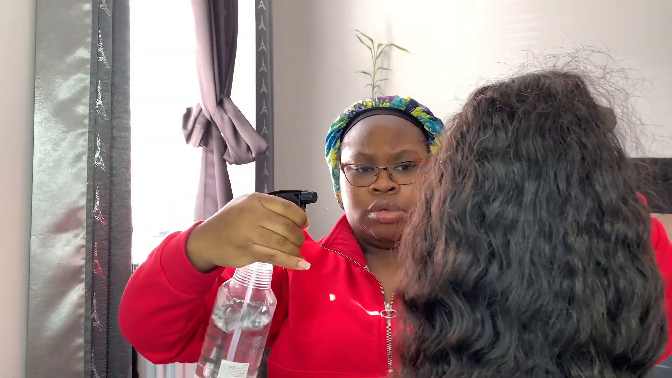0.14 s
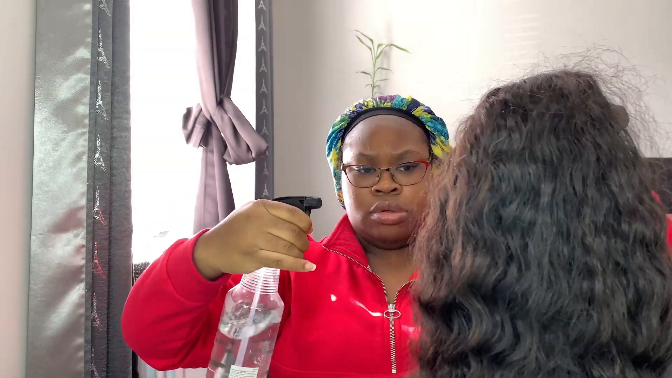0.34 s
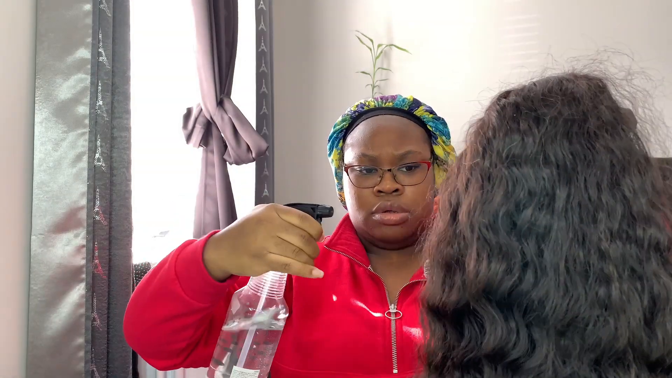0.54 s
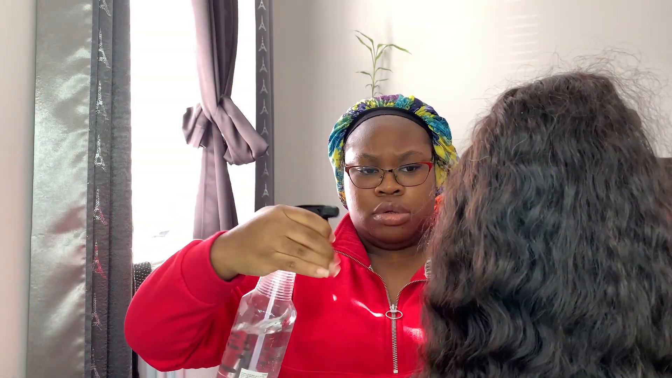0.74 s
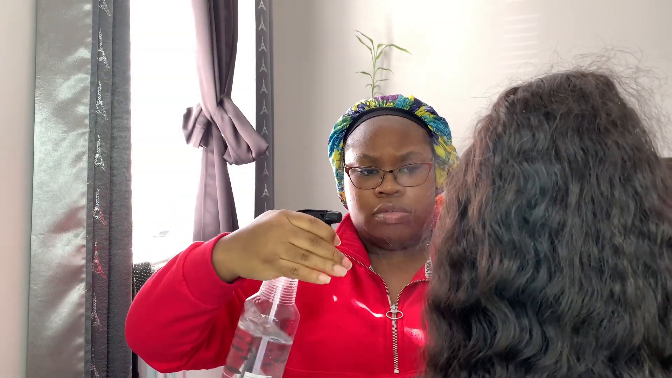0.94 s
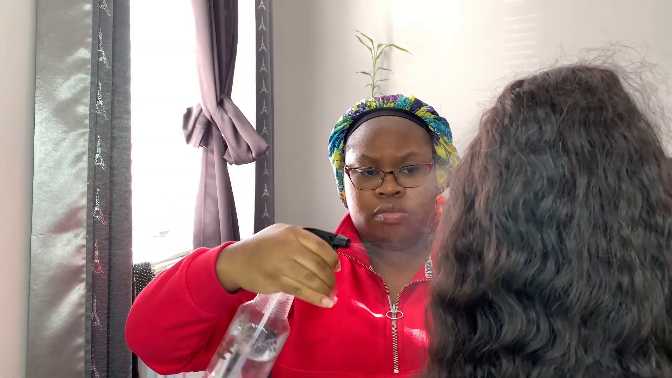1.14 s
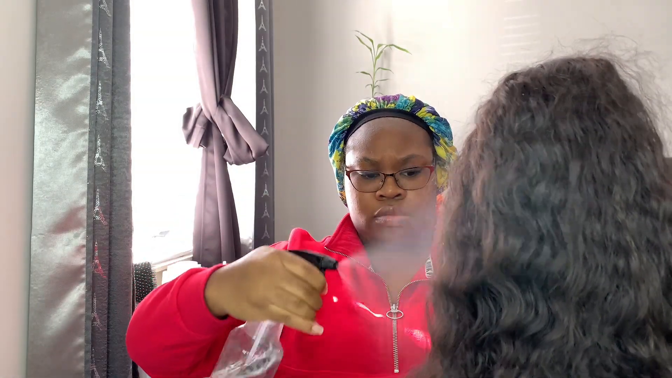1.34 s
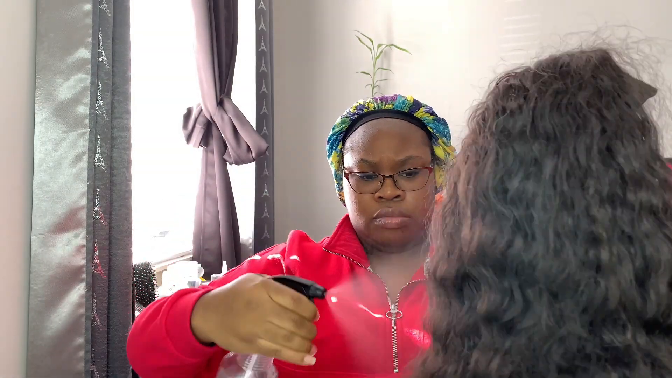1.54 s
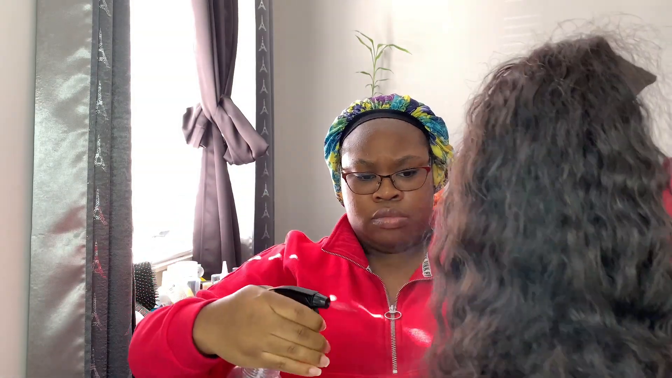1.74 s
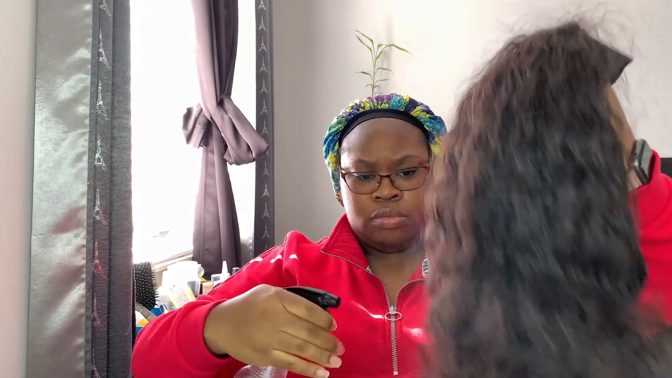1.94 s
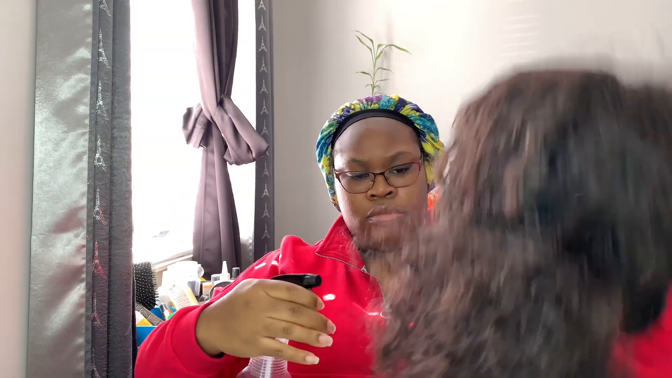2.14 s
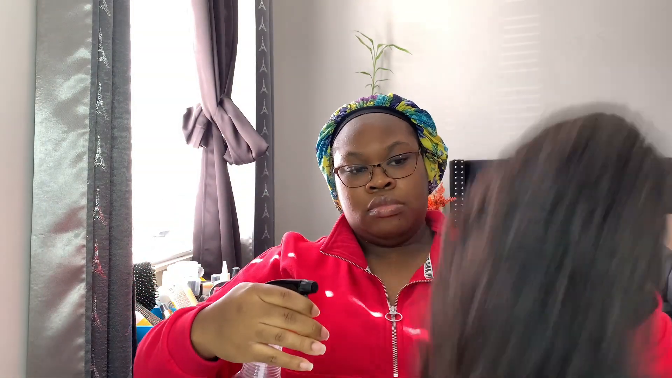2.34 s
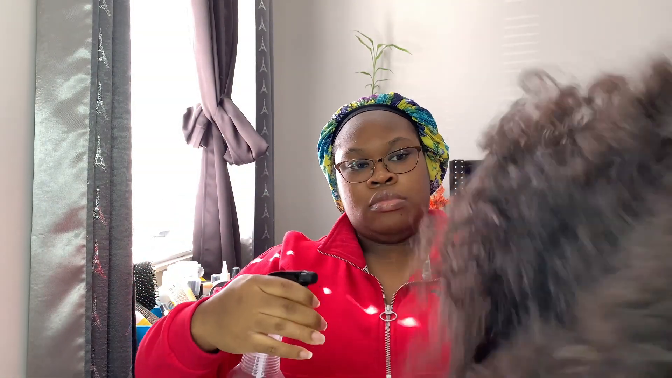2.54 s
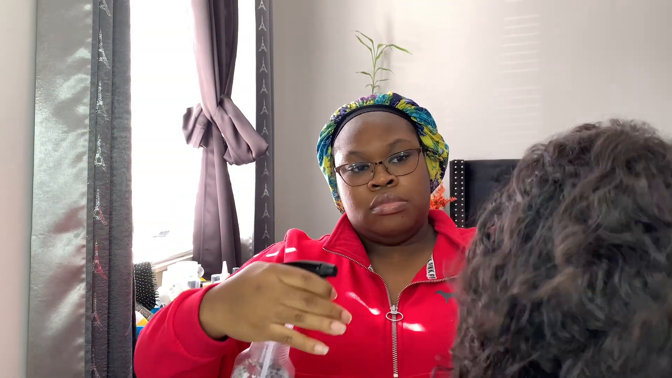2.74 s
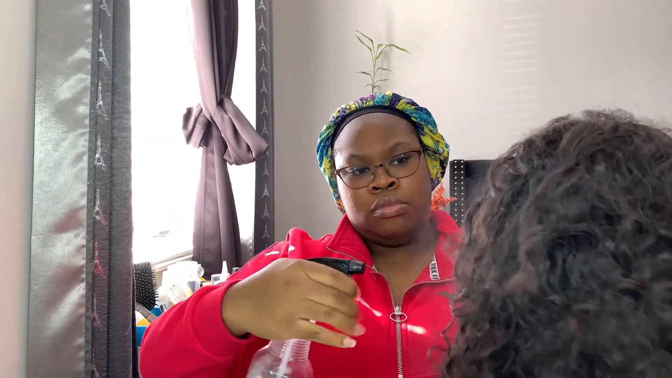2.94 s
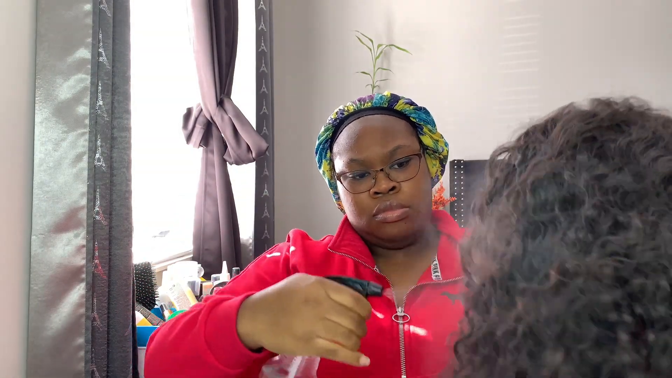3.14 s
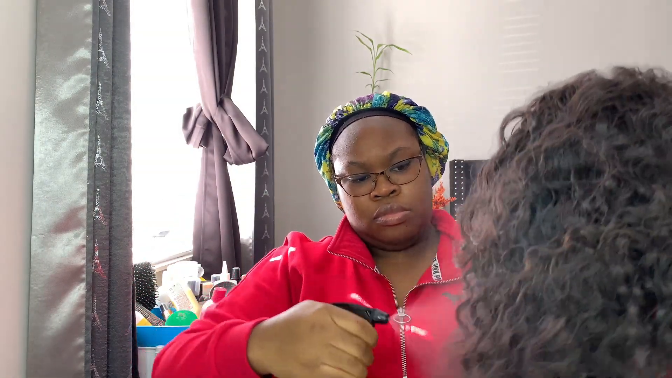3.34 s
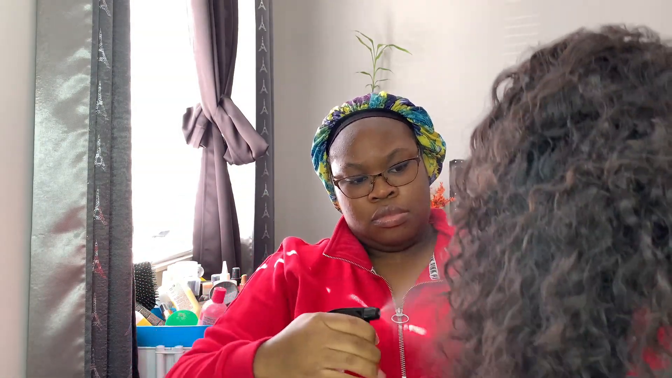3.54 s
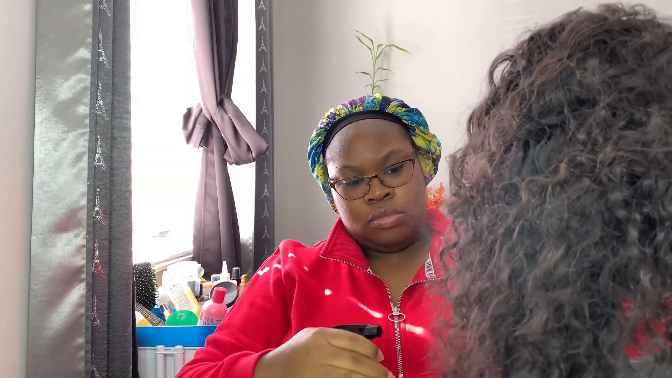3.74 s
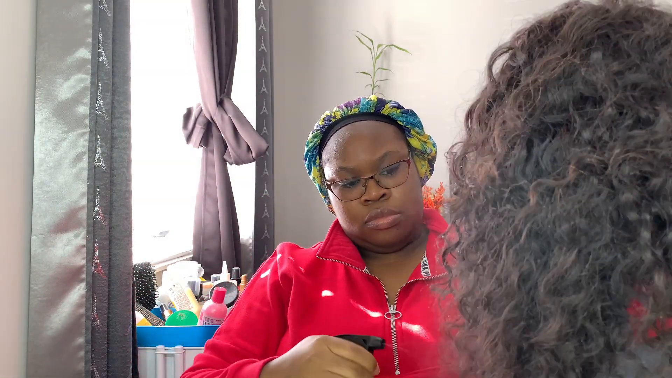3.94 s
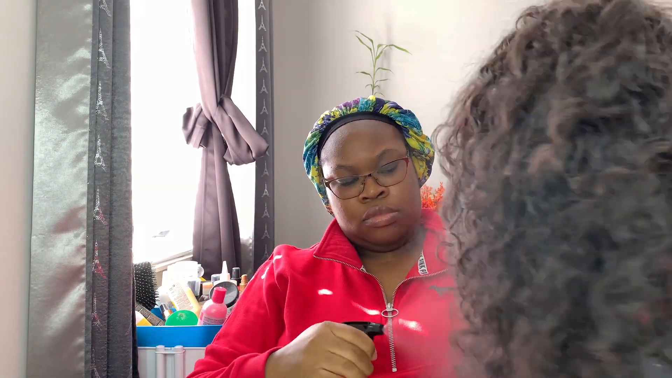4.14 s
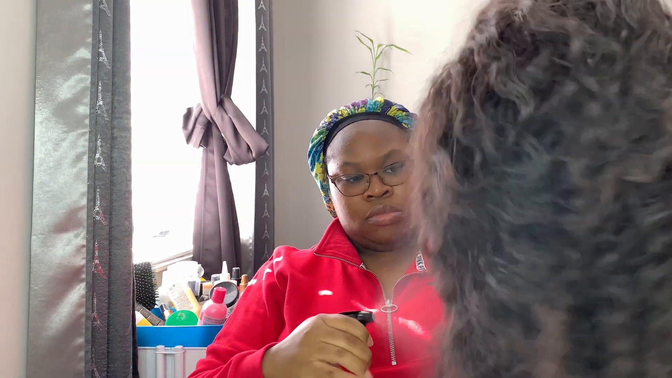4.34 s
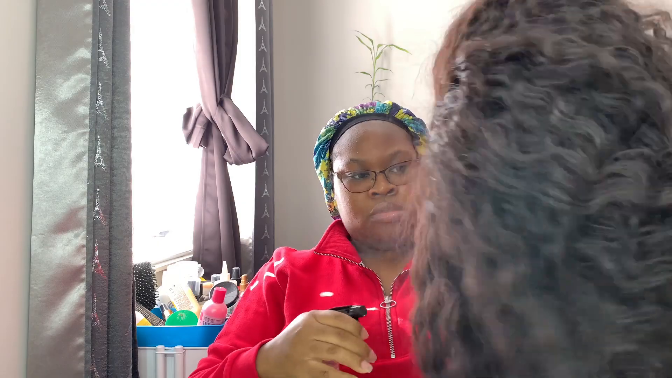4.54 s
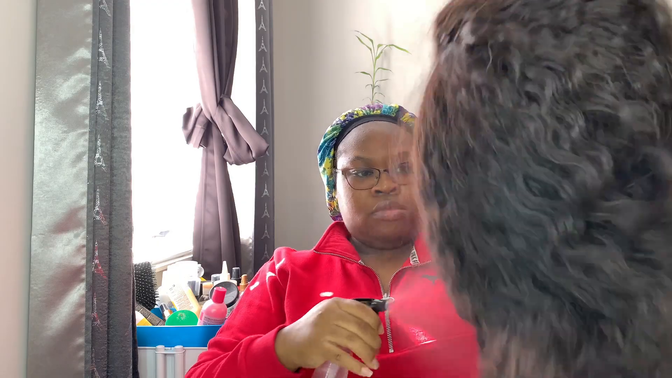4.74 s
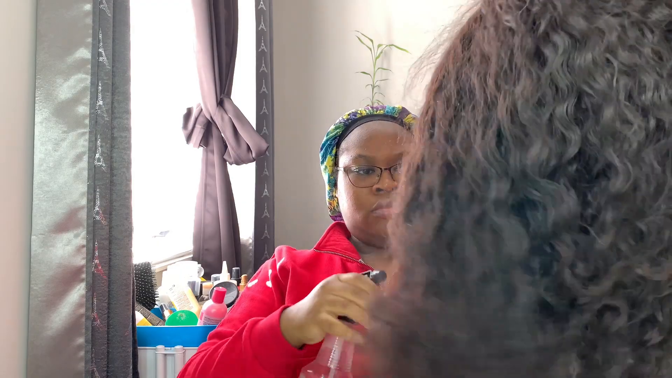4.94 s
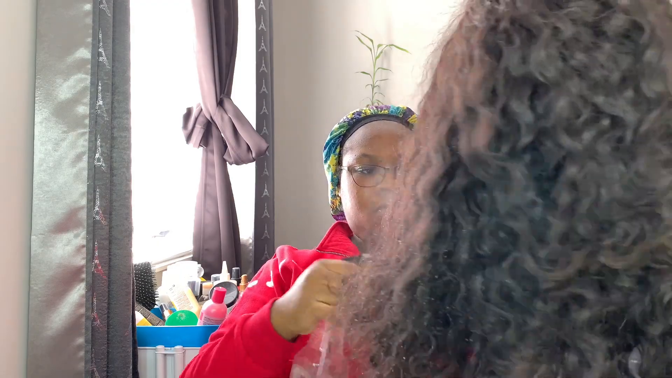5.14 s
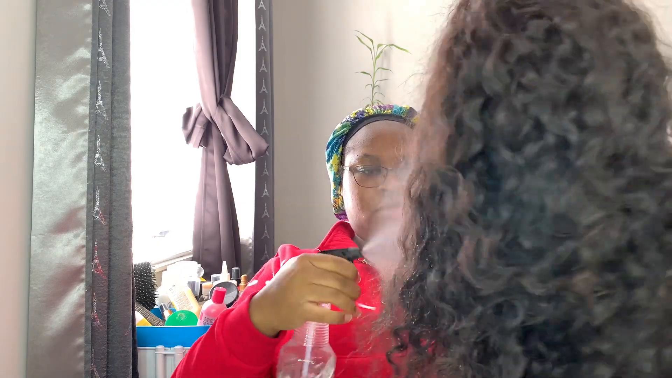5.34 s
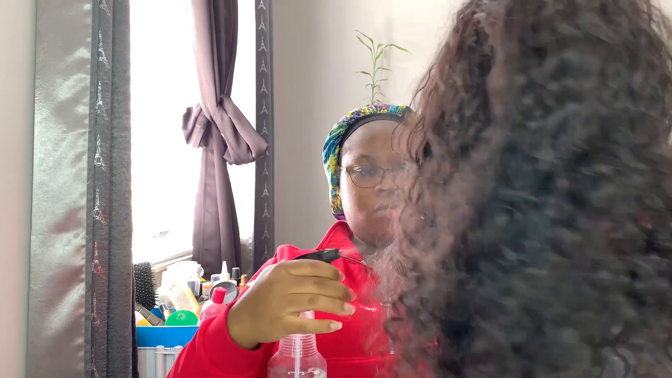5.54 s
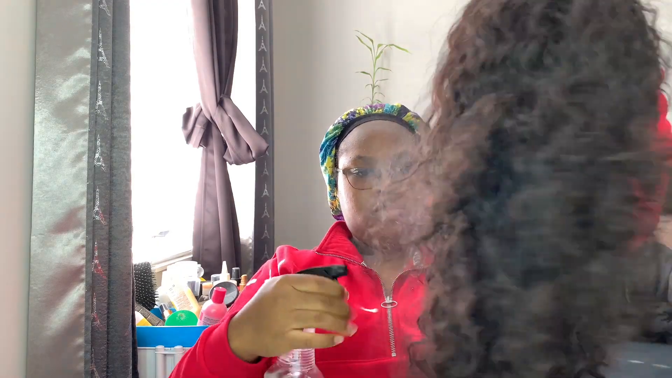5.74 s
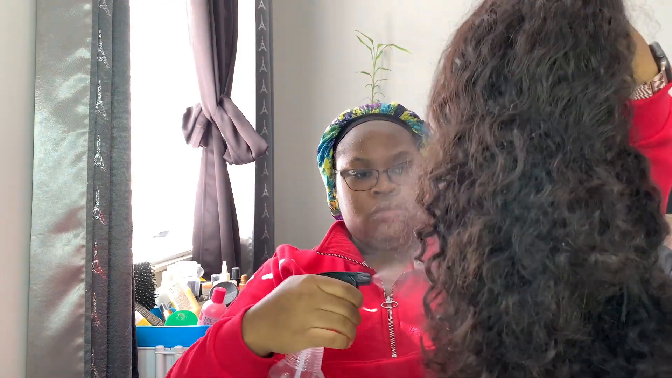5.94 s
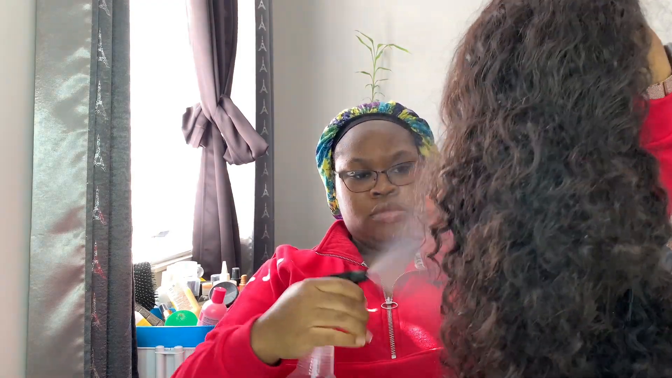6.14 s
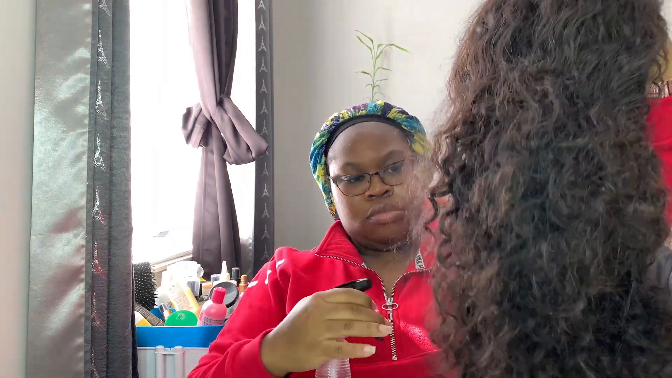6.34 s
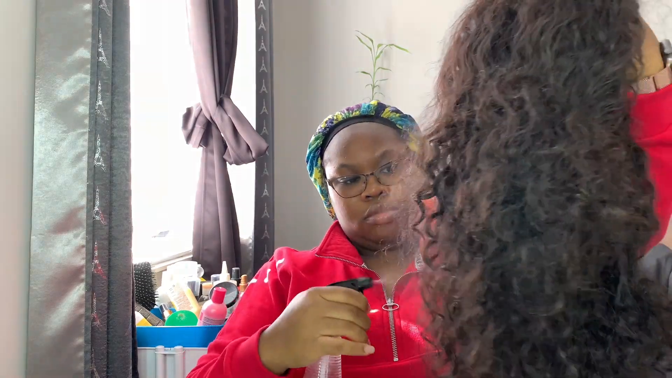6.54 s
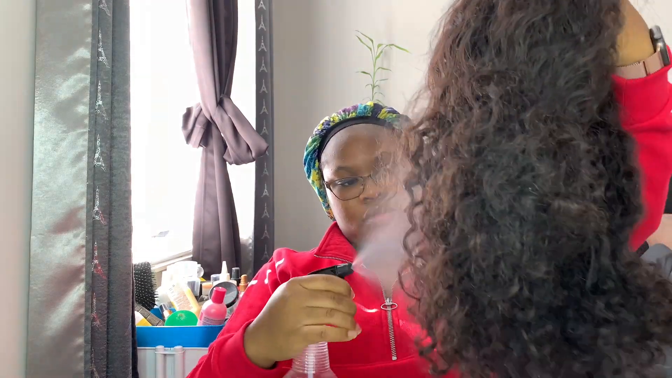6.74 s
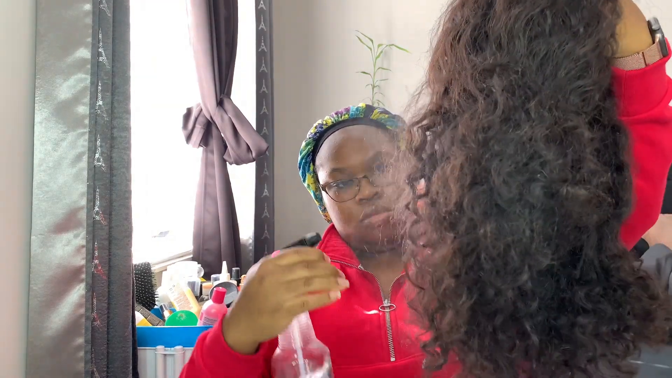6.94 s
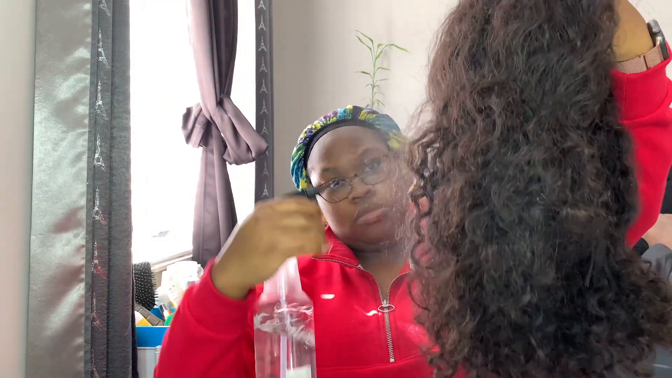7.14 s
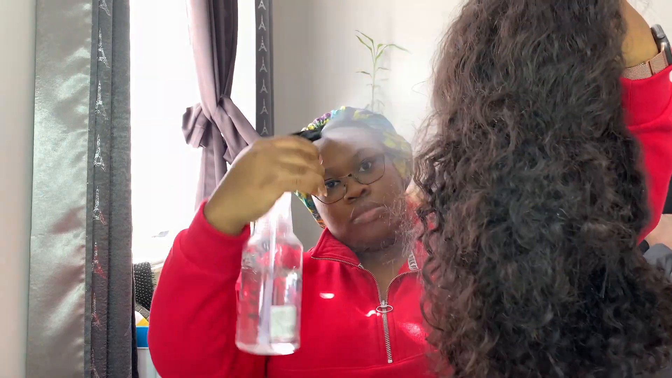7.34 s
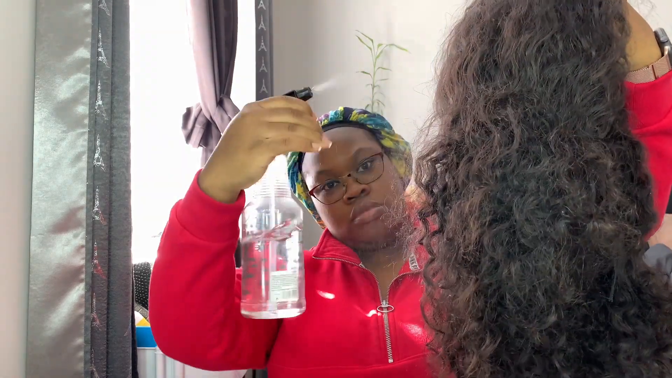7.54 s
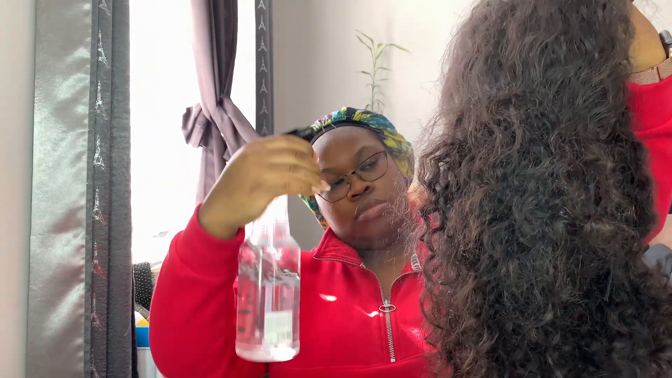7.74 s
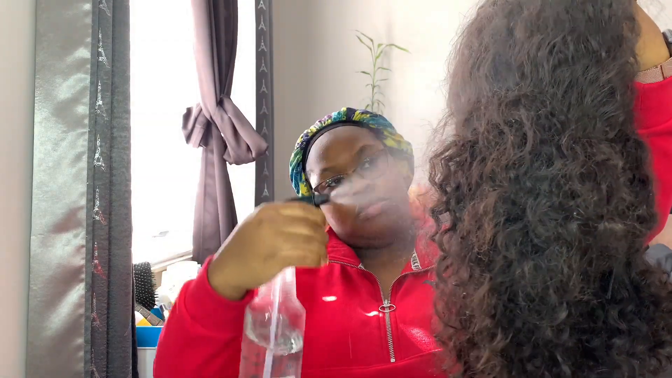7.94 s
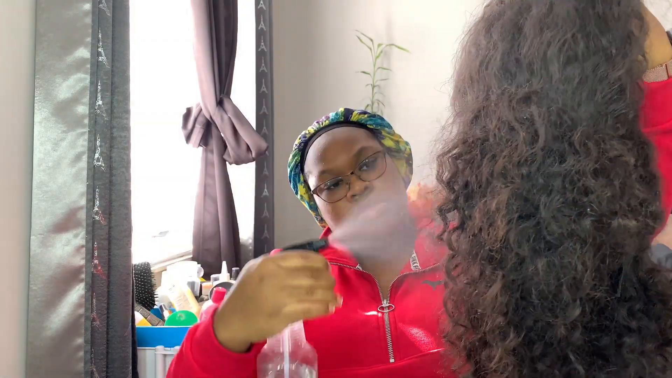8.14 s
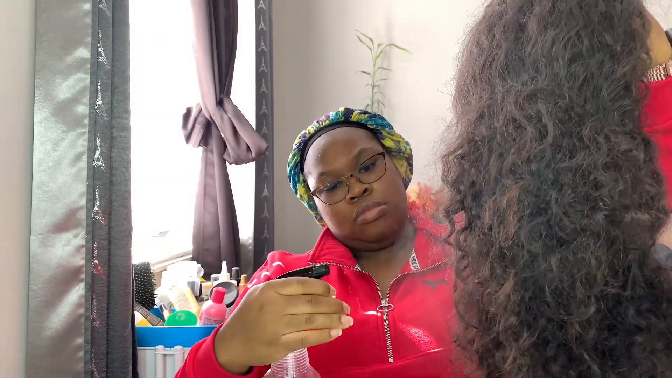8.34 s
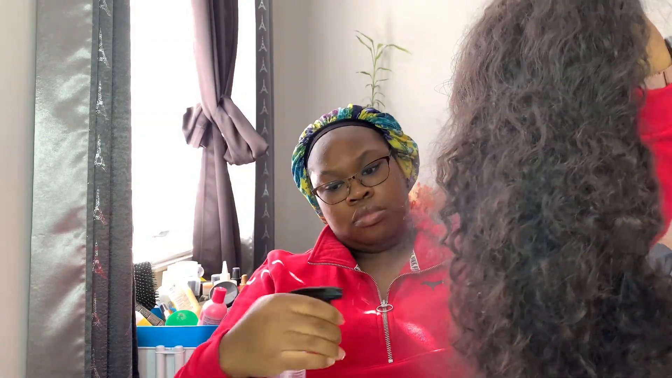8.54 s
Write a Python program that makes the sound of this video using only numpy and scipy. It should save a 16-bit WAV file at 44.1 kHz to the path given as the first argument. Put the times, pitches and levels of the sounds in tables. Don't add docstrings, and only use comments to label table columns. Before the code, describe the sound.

Close to a phone microphone in a furnished room, a hand works a plastic trigger sprayer. Dry rattles and sputtering, clicky strokes come first, then a pause of about a second with soft hair rustle. Steady pulls follow, nearly four per second, each a hollow bottle knock, click and short bright hiss of mist, with a rattling slurp on release. A faint low motor and house rumble lie underneath.

```python
import sys
import numpy as np
from scipy import signal
from scipy.fft import rfft, irfft, next_fast_len
from scipy.io import wavfile
from scipy.ndimage import uniform_filter1d, minimum_filter1d, map_coordinates

SR = 44100
rng = np.random.default_rng(int(sys.argv[2]) if len(sys.argv) > 2 else 0)


def unload_audio(sound):
    columns = np.transpose(np.atleast_2d(sound))
    steps = np.round(np.clip(columns, -1, 1) * 32767)
    wavfile.write(sys.argv[1], SR, steps.astype(np.int16))


def invert_db(x):
    u = np.asarray(x, float) / 20
    return 10 ** u


N = 379260
SIZE = next_fast_len(N + SR // 2)
HZ = np.maximum(np.arange(SIZE // 2 + 1) * SR / SIZE, 1)

# valve click t/s, stroke/s, nozzle level/dB, knock level/dB, bottle f/Hz
PRIMING = [
    (0.733, 0.12, -54, -65, 273),
    (0.9757, 0.14, -52, -45.5, 261),
    (1.231, 0.15, -50.5, -48.5, 270),
    (1.494, 0.13, -46, -44.5, 271),
    (1.734, 0.12, -46, -42, 280),
]
# valve click t/s, stroke/s, nozzle level/dB, knock level/dB, bottle f/Hz
PULLS = [(2.783, 0.13, -46.5, -85, 272), (3.024, 0.12, -43, -42, 269.5), (3.263, 0.13, -41, -41, 268.4),
         (3.5234, 0.13, -44, -39.5, 272), (3.7873, 0.13, -44.5, -46, 273), (4.046, 0.13, -45, -42.5, 284),
         (4.3069, .12, -46, -44, 276), (4.7102, 0.13, -44, -70, 263), (4.993, 0.15, -43, -50, 280),
         (5.2748, 0.14, -43.5, -50.5, 274), (5.5472, 0.14, -43.5, -53.5, 276),
         (5.827, 0.14, -44, -43.5, 275), (6.1046, 0.14, -43, -44.5, 273), (6.388, 0.15, -45, -48.5, 275),
         (6.6798, 0.15, -44, -50.5, 280), (6.9703, 0.15, -46, -42.5, 279), (7.265, 0.14, -46.5, -51.5, 283),
         (7.5415, 0.16, -49, -44.5, 260), (7.8312, 0.14, -49, -43, 270), (8.1075, 0.13, -45.5, -42.5, 255),
         (8.3774, 0.12, -43, -45, 275)]
# valve click t/s, slurp fall/s, slurp level/dB, click level/dB
RELEASES = [(0.407, 0.045, -57, -50), (0.646, 0.037, -52.5, -42), (0.8897, 0.034, -52.5, -37),
            (1.1644, 0.026, -52.5, -40), (1.4354, 0.015, -50, -34), (1.675, 0.028, -58, -42),
            (1.929, 0.043, -55, -42), (2.979, 0.04, -53.5, -45), (3.2093, 0.02, -49, -33),
            (3.457, 0.037, -51, -35), (3.706, 0.032, -48.5, -28.5), (3.9646, 0.011, -49, -42),
            (4.243, 0.032, -51, -43), (4.923, 0.029, -55.5, -67), (5.2027, 0.025, -52, -32.5),
            (5.4818, 0.021, -52, -33), (5.757, 0.032, -52.5, -31.5), (6.027, 0.026, -49, -33),
            (6.311, 0.032, -51.5, -43), (6.605, 0.037, -56.5, -42), (6.894, 0.025, -56.5, -60),
            (7.7494, .043, -61.5, -56), (8.0686, 0.047, -76, -45.5), (8.326, 0.016, -54, -44)]
PURGE_S = 0.36
STRIKE_VARY_DB = 2.5


def rms_one(x):
    return x / np.sqrt(np.mean(x ** 2) + 1e-20)


def at_hz(points):
    hz, db = np.transpose(points)
    return invert_db(np.interp(np.log(HZ), np.log(hz), db))


def coloured(x, gains):
    return irfft(rfft(x, SIZE) * gains, SIZE)[..., :N]


def flicker(rate, depth_db):
    r = np.exp(-2 * np.pi * rate / SR)
    slow = signal.lfilter([1], [1, -2 * r, r * r], rng.standard_normal(N + SR))[SR:]
    return invert_db(depth_db * np.minimum(rms_one(slow), 1.5))


def grains(per_s, spread_db):
    sizes = invert_db(spread_db * np.minimum(rng.exponential(1, N), 3))
    sizes = sizes * np.sign(rng.random(N) - .5)
    return rms_one(sizes * (rng.random(N) < per_s / SR))


def ring(blows, hz, t60):
    r, w = invert_db(-60 / (t60 * SR)), 2 * np.pi * hz / SR
    return signal.lfilter([0, np.sin(w)], [1, -2 * r * np.cos(w), r * r], blows + 1e-18)


def swells(rows, rise_power, fall_power, lead, opens):
    dull, bright = np.zeros((2, N))
    for top, rise, fall, level_db, bright_db in rows:
        at = np.arange(max(int((top - .18) * SR), 0), min(int((top + .18) * SR), N))
        late = np.maximum(at / SR - top, 0) / fall
        early = np.maximum(top - at / SR, 0) / rise
        shut = late ** fall_power + (early / opens) ** 16
        dull[at] += invert_db(level_db - 12 * (early ** rise_power + shut))
        bright[at] += invert_db(level_db + bright_db - 12 * ((early / lead) ** rise_power + shut))
    return dull, bright


def played(source, gains, dull, bright, split_hz):
    high = 1 / (1 + (split_hz / HZ) ** 4)
    air = 1 / (1 + (11500 / HZ) ** 12)
    band = (HZ > 1100) & (HZ < 3500)
    parts = rfft(source, SIZE) * gains / np.sqrt(np.sum(gains[band] ** 2) / len(HZ))
    airy = bright * np.clip(bright / (dull + 1e-9), .5, 4) ** .5
    shares = (dull, 1 - high), (bright, high * (1 - air)), (airy, high * air)
    return sum(gain * irfft(parts * share, SIZE)[..., :N] for gain, share in shares)


def patchy(x, depth_db, patch_hz, patch_s):
    hz, s, parts = signal.stft(x, SR, nperseg=256)
    field = rng.standard_normal((200, 1000))
    spots = map_coordinates(field, np.meshgrid(hz / patch_hz, s / patch_s, indexing="ij"), order=1)
    return signal.istft(parts * invert_db(depth_db * spots), SR, nperseg=256)[1][..., :N]


def squirts():
    lag_s, build_share = 0.015, 0.54
    for s, stroke, level_db, _, _ in PRIMING + PULLS:
        jet = stroke - lag_s
        air_db = 9.5 * np.exp((PRIMING[0][0] - s) / PURGE_S)
        rise, fall = build_share * jet, (1 - build_share) * jet
        yield s + lag_s + rise, rise, fall, level_db, 2 + air_db


def mist():
    # f/Hz, level/dB per Hz
    mist_colour = [(200, -14), (400, -10), (600, -15), (850, -9.5), (1100, -10), (2000, -10), (3000, -2.5),
                   (3700, -4), (6000, -7), (8300, -3), (9000, -2.5), (12500, -5.5), (15400, -6.5),
                   (15900, -62)]
    # f/Hz, width/Hz, level/dB
    nozzle = [(1605, 623, 13), (2520, 880, 5), (4140, 190, -1.5), (4980, 1100, 3.5), (5320, 170, 3.5),
              (3140, 120, 0.5)]
    gains = at_hz(mist_colour)
    for hz, width, peak_db in nozzle:
        gains = gains * invert_db(peak_db / (1 + (2 * (HZ - hz) / width) ** 2))
    jet = rng.standard_normal((3, N)) * flicker(107, depth_db=0.6) + 0.3 * grains(1200, spread_db=3.0)
    dull, bright = swells(squirts(), rise_power=3.1, fall_power=1.9, lead=1.0, opens=1.35)
    trapped = np.exp(-np.abs(np.arange(N) / SR - PRIMING[0][0]) / PURGE_S)
    spit = (flicker(130, depth_db=4.5) * invert_db(2)) ** trapped
    return invert_db(0.5) * played(jet, gains, dull, bright * spit, split_hz=8200)


def aimed(x):
    # t/s, sizzle level/dB as the nozzle faces the phone, body level/dB as the bottle swings near
    aim = [(1.05, 0.5, 3), (1.55, -2, 1), (2.85, 0.5, 1), (3.1, 0, -3.5), (3.33, 0.5, -4.5),
           (3.6, 4.5, 1.5), (3.86, 3.5, 1), (4.401, -0.5, 2.5), (4.78, -0.5, 0.5), (5.35, 1, 0),
           (5.9, 0, -1.5), (6.45, 1.5, 0.5), (6.75, 1, -0.5), (7.041, -3.5, 0.5), (7.6, -2.5, 1),
           (7.9, 0, 7), (8.17, -4, 4), (8.45, -1, 0)]
    hz, s, parts = signal.stft(x, SR, nperseg=256)
    at, sizzle_db, body_db = np.transpose(aim)
    sizzle = np.exp(-(np.log2((hz + 1) / 4630) / 0.85) ** 2)
    body = 1 / (1 + (hz / 1070) ** 6)
    gain_db = np.outer(sizzle, np.interp(s, at, sizzle_db))
    gain_db += np.outer(body, np.interp(s, at, body_db))
    return signal.istft(parts * invert_db(gain_db), SR, nperseg=256)[1][:, :N]


def gulps():
    # top t/s, level/dB
    puffs = [
        (.7, -65.5),
        (.929, -64),
        (1.496, -69),
        (1.74, -59.5),
        (2.179, -78),
        (7.545, -57.5),
        (8.111, -55),
    ]
    # top t/s, fall/s, level/dB, brightness/dB
    splutters = [
        (.2245, 0.023, -46, -18),
        (.266, 0.025, -53.5, 14.5),
        (1.201, 0.022, -59, 10),
        (4.523, 0.059, -87, -45),
        (7.835, 0.078, -57, 15),
    ]
    return ([(s + 0.0027, 0.0097, fall, db, -15.5) for s, fall, db, _ in RELEASES]
            + [(s, 0.01, 0.052, db, 19.5) for s, db in puffs]
            + [(s, 0.0056, fall, db, bright) for s, fall, db, bright in splutters])


def dry_strokes():
    swishes = [(.01, 0.034, -71, -13), (.045, .012, -58, 10), (0.057, 0.015, -45, 8.5),
               (0.069, 0.014, -53.5, 1), (.093, .03, -61.5, 6), (.3, 0.021, -51, 3), (.565, 0.032, -70, 15),
               (2.19, .025, -76, 0), (0.183, 0.0072, -61, -7), (.395, .03, -70, 6),
               (0.195, 0.024, -56, -12), (0.489, 0.015, -55.5, 6), (.514, 0.0087, -54.5, 18),
               (0.532, 0.014, -43, 8), (0.74, 0.022, -41.5, -12), (2.154, 0.026, -70.5, 18),
               (2.297, 0.011, -76, 12), (2.22, .012, -72, 8), (2.396, 0.027, -65, 1),
               (2.432, 0.012, -80, 8), (2.639, 0.024, -81, -7), (3.504, 0.019, -65, -13),
               (3.99, 0.029, -58, -11), (7.193, 0.026, -60, -21)]
    return [(s, 0.69 * fall, fall, db, bright) for s, fall, db, bright in swishes]


def slurps():
    # f/Hz, level/dB per Hz
    slurp_colour = [(320, -10), (600, -25.5), (850, -13.5), (1300, -7.5), (2100, -7), (2700, -3),
                    (3500, -9), (6000, -10.5), (8300, -6.5), (10500, -11), (13500, -14), (15600, -19)]
    flow = 0.47 * rng.standard_normal(N) + 0.29 * grains(1500, spread_db=1.0)
    flow = flow * flicker(123, depth_db=4.5)
    wet = swells(gulps(), rise_power=1.2, fall_power=0.99, lead=0.37, opens=3.7)
    swish = swells(dry_strokes(), rise_power=1.6, fall_power=1.18, lead=0.71, opens=1.3)
    dull, bright = np.add(wet, swish)
    return invert_db(-0.33) * played(flow, at_hz(slurp_colour), dull, bright * invert_db(-2.0), split_hz=9000)


def contacts():
    # t/s, peak level/dB
    rattles = [(0.191, -38), (.1974, -32), (0.239, -33), (.2606, -28), (.3905, -43), (0.423, -38.5),
               (0.483, -49), (.789, -45), (.8243, -36), (0.926, -24), (1.0304, -34), (1.0452, -24.5),
               (1.37, -34), (1.491, -19.5), (1.9544, -38), (2.1535, -55), (2.176, -57), (2.2952, -54),
               (2.4306, -53), (3.221, -35), (3.237, -29.5), (3.462, -30), (3.486, -35), (3.725, -36.5),
               (3.731, -39), (3.984, -35), (4.262, -37.5), (5.765, -39), (6.623, -39), (7.7866, -47),
               (0.1924, -39), (0.2006, -36), (0.2714, -41), (0.4554, -48), (0.482, -39), (0.644, -37),
             (0.6578, -35), (0.6686, -38), (0.6758, -41), (0.718, -31), (0.783, -25), (0.824, -40),
             (0.8457, -43), (0.9058, -40), (0.9126, -34), (0.9475, -34), (1.031, -26), (1.057, -24),
             (1.182, -41.0), (1.2626, -33), (1.3164, -29), (1.3343, -26), (1.3874, -56), (1.443, -39.0),
             (1.4538, -48), (1.6867, -44.0), (1.696, -46.0), (1.79, -35), (1.9228, -42), (1.9424, -45),
             (2.1579, -54), (2.175, -45), (2.4306, -49), (2.985, -43), (2.9975, -31), (3.0495, -28.5),
             (3.221, -35), (3.4724, -39), (3.4795, -40), (3.9643, -42), (3.9969, -38), (4, -42),
             (4.0332, -47), (4.0453, -32), (5.222, -41), (5.4963, -34), (5.5425, -37), (5.769, -37),
             (5.7761, -41), (5.8613, -32), (6.0232, -37), (6.0444, -38), (6.2631, -47), (6.3142, -42),
             (6.3253, -40.0), (6.8972, -54), (6.9133, -49), (7.201, -46), (7.75, -48), (8.3232, -39)]
    # t/s, peak level/dB
    taps = [(0.049, -45), (.0536, -33), (0.153, -47.5), (0.2238, -37), (.51, -37), (0.6977, -30),
            (0.739, -35), (0.777, -38), (.811, -39), (0.9475, -22), (0.9794, -33), (1.0601, -49),
            (1.1986, -31.5), (1.2308, -30), (1.2625, -44), (1.589, -24), (1.967, -34), (2.218, -51),
            (2.3944, -63), (2.968, -40), (2.9982, -42), (3.2615, -35), (3.3706, -44), (3.5234, -24.5),
            (4.0456, -45), (7.5401, -31.5), (7.8308, -29.5), (1.7345, -47), (6.038, -37), (8.1061, -26.5)]
    full_db, thin_db = -5.5, -19.5
    pulls = [(s, max(-24 + 1.53 * (db + 40), -45.5)) for s, _, _, db, _ in PRIMING + PULLS]
    releases = [(s, db) for s, _, _, db in RELEASES]
    full = [(s, db, full_db) for s, db in pulls + taps]
    return full + [(s, db, thin_db) for s, db in releases + rattles]


def clicks():
    # f/Hz, level/dB, t60/s
    bright_modes = [(6780, -5, 0.0072), (8180, -1.5, 0.0083), (8840, -5, 0.01), (9850, 0.5, 0.0027),
                    (12700, -18, 0.013), (13300, -4.5, 0.00096), (14250, -1, 0.001)]
    dull_modes = [(1318, -7.5, 0.033), (1700, -15.5, 0.081), (2770, -9.5, 0.036), (3420, -15, 0.012),
                  (4790, -1.5, 0.004)]
    s, peak_db, dull_db = np.transpose(contacts())
    at, out = (s * SR).astype(int), np.zeros(N)
    modes = [(m, peak_db - 6.5) for m in bright_modes]
    modes += [(m, peak_db + dull_db - 7.5) for m in dull_modes]
    chance = rng.normal(0, STRIKE_VARY_DB, (len(at), len(modes)))
    for k, ((hz, level_db, t60), blow_db) in enumerate(modes):
        blows = np.zeros(N)
        blows[at] = invert_db(blow_db + level_db + chance[:, k]) * (-1) ** k
        out += ring(blows, hz, t60)
    return out


def knocks():
    # ratio to the neck tone, level/dB, t60/s
    bottle = [(0.974, -6.5, 0.073), (0.903, -15.5, 0.1), (1.1, -10.5, 0.09), (1.197, -14, 0.063)]
    # t/s, peak level/dB, f/Hz
    bumps = [
        (0.269, -57, 290),
        (0.49, -50.5, 267),
        (0.703, -48.5, 290),
        (0.79, -65, 302),
        (.931, -46.5, 285),
        (1.205, -51, 277),
        (1.969, -54.5, 275),
        (3.004, -53.5, 290),
        (3.243, -56, 268),
    ]
    out, push = np.zeros(N + SR), np.arange(SR // 4) == 0
    soft_push = np.convolve(push, np.hanning(SR // 400))[:len(push)]
    rows = [(s + 0.00565, db, hz) for s, _, _, db, hz in PRIMING + PULLS] + bumps
    chances = rng.normal(0, 3.5, (len(rows), len(bottle)))
    for (s, peak_db, hz), chance in zip(rows, chances):
        at = int((s - .0052) * SR)
        shove = ring(soft_push, hz, 0.053)
        tone = sum(invert_db(db + vary) * ring(shove, hz * ratio, t60)
                   for (ratio, db, t60), vary in zip(bottle, chance))
        out[at:at + len(push)] += invert_db(peak_db + 5.5) * tone / np.abs(tone).max()
    return out[:N]


def cracks():
    # t/s, peak level/dB
    crack_times = [(0.198, -40), (0.2714, -33.0), (0.3097, -39), (0.4823, -41.0), (0.515, -36),
                   (0.5304, -34), (0.6452, -46), (0.7331, -35.0), (0.7383, -22), (0.7428, -26),
                   (0.799, -29.0), (0.9133, -39), (0.9254, -22.5), (0.9482, -25), (0.9773, -22.5),
                   (0.9847, -25), (0.997, -29), (1.034, -22), (1.0366, -29.0), (1.248, -47), (1.2675, -35),
                   (1.3882, -48), (1.439, -41.0), (1.4967, -23), (1.5895, -38), (1.7334, -28.0),
                   (1.7958, -33), (2.1538, -37), (2.158, -35), (2.178, -31.5), (2.9851, -46), (3.1046, -26),
                   (3.1256, -27), (3.2217, -36.0), (3.2253, -42.0), (3.4536, -41.0), (3.4731, -45),
                   (3.4848, -42.0), (3.5495, -32.0), (3.7254, -36.0), (3.9976, -45), (4.3446, -33.0),
                   (4.3488, -32.0), (4.7237, -35), (5.271, -35), (5.483, -40), (5.497, -42), (5.5431, -40),
                   (5.5771, -29), (5.766, -45), (5.8608, -31.0), (6.0357, -41.0), (6.0401, -42.0),
                   (6.2639, -39), (7.6554, -31), (7.8955, -23), (8.108, -32), (8.1533, -30), (8.3304, -45),
                   (8.3777, -41)]
    # f/Hz, level/dB, t60/s
    crack_modes = [(7400, -38, .002), (8900, -7.5, 0.0014), (10400, -9, .002), (13200, -11, 0.0024),
                   (15000, -21, 0.00145)]
    s, peak_db = np.transpose(crack_times)
    out = np.zeros(N)
    chance = rng.normal(0, STRIKE_VARY_DB, (len(s), len(crack_modes)))
    for (hz, level_db, t60), vary in zip(crack_modes, chance.T):
        blows = np.zeros(N)
        blows[(s * SR).astype(int)] = invert_db(peak_db + level_db + vary)
        out += ring(blows, hz, t60)
    return out


def ticks():
    # t/s, peak level/dB, f/Hz
    tick_times = [(.070, -55, 418), (0.222, -31, 1670), (.2232, -35.5, 3780), (.52, -36, 1700),
                  (2.634, -65, 1600), (0.223, -43, 1040), (0.280, -39.5, 780), (.262, -49, 1000),
                  (.3, -43.5, 700), (.55, -50, 605), (4.991, -46, 2600), (0.409, -40, 2700),
                  (.409, -42.5, 1640), (0.511, -38, 816), (.535, -43, 664), (0.646, -38.5, 1700),
                  (0.894, -46, 1750), (1.139, -40, 1640), (1.141, -34, 2520), (1.197, -24, 1650),
                  (1.199, -53, 950), (1.207, -36, 1700), (0.0424, -44, 2460), (.1822, -48, 2000),
                  (3.776, -39, 1130), (3.7845, -30, 3800), (3.7856, -40, 2900), (4.2142, -49, 2190),
                  (4.926, -43, 3070), (2.397, -58, 2500), (7.196, -44, 2900), (1.691, -41, 634),
                  (1.701, -44, 900), (2.177, -51, 2830), (2.636, -55, 1270), (3.444, -47, 1194),
                  (3.497, -37, 1103), (3.496, -37, 555), (3.505, -34, 844), (3.201, -50, 1500),
                  (3.527, -44, 485), (3.759, -52, 1270), (4.035, -49, 1990), (4.519, -43.5, 1246),
                  (4.556, -57, 1920), (5.482, -42, 2800), (7.545, -34, 850), (7.543, -36, 1370),
                  (7.832, -33.5, 1370), (7.835, -55, 520), (8.058, -56, 2483), (8.108, -31, 1090),
                  (8.108, -42.5, 476), (8.590, -43.5, 2700)]
    out, t = np.zeros(N + SR), np.arange(SR // 8) / SR
    for s, peak_db, hz in tick_times:
        at = int(s * SR)
        blow = 0.08 * rng.standard_normal(len(t)) * np.exp(-(t / 0.011) ** 2)
        blow[0] = 1
        no_bass = signal.butter(2, .8 * hz, "high", fs=SR, output="sos")
        blow = signal.sosfilt(no_bass, blow)
        cluster = sum(ring(blow, hz * ratio, 0.0098) for ratio in (.92, 1, 1.08))
        out[at:at + len(t)] += invert_db(peak_db - 13.5) * cluster
    return out[:N]


def rustle():
    # t/s, level/dB
    rustle_level = [
        (1.95, -90),
        (2.1, -70.5),
        (2.2, -68),
        (2.28, -76),
        (2.34, -76),
        (2.41, -66),
        (2.47, -77),
        (2.6, -98),
    ]
    s, level_db = np.transpose(rustle_level)
    gain = invert_db(np.interp(np.arange(N) / SR, s, level_db, left=-120, right=-120))
    fibres = rng.standard_normal(N) * flicker(28, depth_db=3.0) + 0.33 * grains(400, spread_db=-5)
    colour = at_hz([(500, -28), (1500, -6.5), (2800, 3.0), (5000, -9.5), (9000, -8), (13500, -1),
                    (15500, 1), (16000, -30)])
    return gain * rms_one(coloured(fibres, colour))


def echoes(t60):
    t = np.arange(SR // 2) / SR
    tails = rng.standard_normal((2, len(t))) * invert_db(-60 * t / t60) * (t > .001)
    return rfft(tails / np.sqrt(np.sum(tails ** 2, axis=1, keepdims=True)), SIZE)


def microphone_pair():
    # f/Hz, radians by which left leads; above 7 kHz a plain path difference
    lead_points = [(0, 0), (300, -.4), (620, 2.2), (1500, .3), (2200, 0), (3400, 2.2), (3900, .5),
                   (4750, 2.9), (5200, 6.3), (6300, 4.2), (7250, 3.05), (9300, 0), (16300, -9.45)]
    # f/Hz, left minus right level/dB
    tilt = [(400, -2), (700, 1), (1700, -1), (2500, -1.5), (4500, -6), (6000, -4), (7000, 3), (8000, -0.5)]
    lead = np.interp(HZ, *np.transpose(lead_points))
    left = np.sqrt(at_hz(tilt)) * np.exp(.5j * lead)
    return np.array([left, 1 / left])


def motor():
    # t/s, f/Hz, level/dB, octave level/dB
    motor_course = [
        (0, 55.1, -76, 6.5),
        (1.498, 58.03, -72.5, -4.5),
        (3.3, 59.17, -64, -4),
        (3.9, 79.8, -68.5, -20),
        (7.6, 82.26, -69, -21),
        (8.6, 75.9, -65.5, -25),
    ]
    s, *controls = np.transpose(motor_course)
    hz, level_db, octave_db = (np.interp(np.arange(N) / SR, s, c) for c in controls)
    turn = 2 * np.pi * np.cumsum(hz * flicker(3.6, depth_db=0.44)) / SR
    low = np.sin(turn) * flicker(2.7, 2.3)
    octave = np.sin(2 * turn) * flicker(2.4, 3.9)
    return invert_db(level_db) * (low + invert_db(octave_db) * octave)


def background():
    # f/Hz, level/dB per Hz
    rumble_colour = [(28, -43), (45, -2.5), (60, 2.5), (70, -2.5), (81, -2), (97, -2), (125, -4.5),
                     (170, -17.5), (300, -24), (550, -56), (900, -63)]
    hiss_colour = [(300, 15), (600, 2), (1500, -3.5), (5000, -4), (7000, 8), (8500, 4), (15000, 7),
                   (15600, -25)]
    noise = rfft(rng.standard_normal((3, N)), SIZE)
    apart = at_hz([(60, -16.0), (150, -14.0), (500, 10.0), (5000, 7.0), (8000, -13)])
    ports = noise[0] * microphone_pair() + noise[1:] * apart
    rumble, hiss = (rms_one(irfft(ports * at_hz(colour), SIZE)[:, :N])
                    for colour in (rumble_colour, hiss_colour))
    return invert_db(-68.5) * flicker(3.8, depth_db=2.5) * rumble + motor() + invert_db(-77) * hiss


def scene():
    # f/Hz, level/dB against the direct path
    scatter_colour = [(200, -13), (560, -7), (1600, -5.5), (2000, -1.5), (2500, -8), (3600, -2.5),
                      (6200, 1), (7500, 0.5), (9000, -3), (15000, -6.5)]
    pair, scatter = microphone_pair(), at_hz(scatter_colour)
    tails = echoes(t60=0.25)
    front = HZ ** 4 / (HZ ** 4 + 7000.0 ** 4)
    room = invert_db(-6) * (tails * (1 - front / 2) + tails[0] * pair * front)
    room *= at_hz([(120, 8), (280, 11.5), (580, 1.5), (900, 1.5), (2000, -1.0), (8000, 2.0), (15000, -45)])
    near = scatter * echoes(t60=0.004)

    flows = rfft(patchy(aimed(mist()), depth_db=4.0, patch_hz=370.7, patch_s=.03), SIZE)
    mist_room = room * at_hz([(700, -2), (1500, -5.5), (4000, -1.5)])
    heard = flows[0] * (pair + mist_room) + flows[1:] * scatter

    soft = patchy(slurps() + rustle(), depth_db=3.0, patch_hz=592, patch_s=0.048)
    heard += rfft(soft, SIZE) * (pair + room + near)
    heard += rfft(clicks() + ticks(), SIZE) * (pair + invert_db(-0.5) * room + invert_db(0.5) * near)
    bottle_side = invert_db([[-3], [3]])
    heard += rfft(knocks(), SIZE) * (bottle_side * pair + invert_db(-12) * room)
    heard += rfft(cracks(), SIZE) * (pair + invert_db(-6) * (room + near))
    return irfft(heard, SIZE)[:, :N] + background()


def gaps(bands):
    return invert_db(sum(depth_db / (1 + (2 * (HZ - hz) / width) ** 6) for hz, width, depth_db in bands))


def roll_off(x):
    return signal.sosfilt(signal.butter(12, 16470, fs=SR, output="sos"), x)


def record(dry):
    # f/Hz, width/Hz, level/dB
    sum_gaps = [(11730, 900, -40), (7300, 200, -16)]
    difference_gaps = [(9250, 750, -22), (13900, 1300, -30)]
    top_cut = signal.cheby2(12, 60, 16650, fs=SR, output="sos")
    left, right = signal.sosfilt(top_cut, dry)
    bass_cut = 1 / (1 + (32 / HZ) ** 6)
    both = coloured(np.array([left + right, left - right]) / 2, bass_cut)
    thinned = coloured(both, np.array([gaps(sum_gaps), gaps(difference_gaps)]))
    power = np.diff(both[0], prepend=0) ** 2 + 1e-12
    before = np.roll(uniform_filter1d(power, 512), 384)
    jumps = uniform_filter1d(power, 128) > invert_db(2 * 10) * before
    jumps |= flicker(14, depth_db=1) > invert_db(1.35)
    held = -minimum_filter1d(-1.0 * jumps, int(.012 * SR))
    kept = uniform_filter1d(held, 256)
    mid, side = thinned + kept * (both - thinned)
    return roll_off(np.array([mid + side, mid - side]))


dry = scene()
out = record(dry)
unload_audio(out)
```